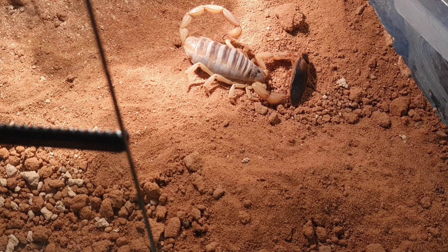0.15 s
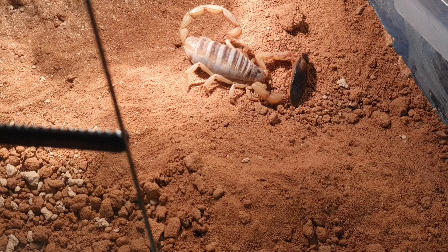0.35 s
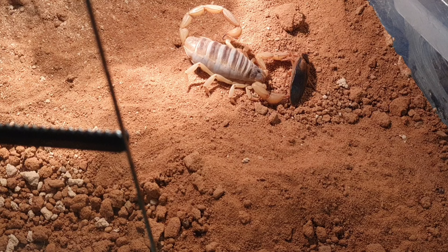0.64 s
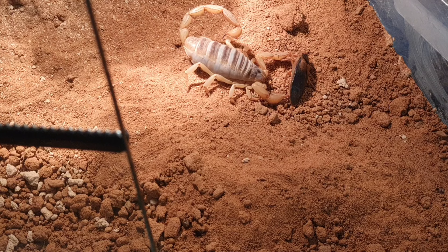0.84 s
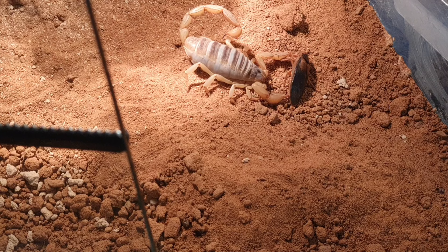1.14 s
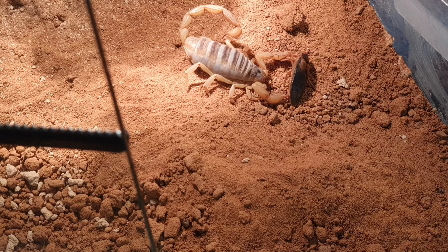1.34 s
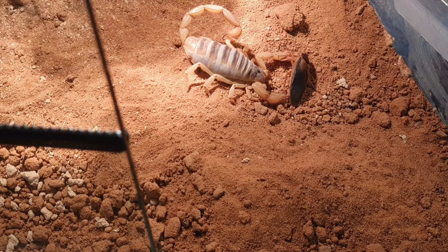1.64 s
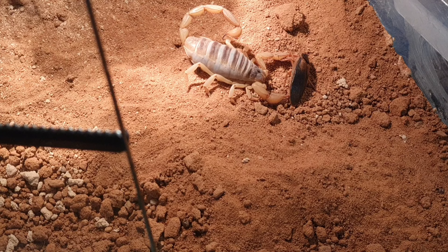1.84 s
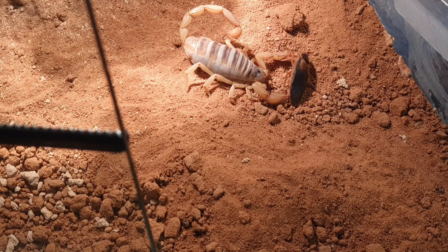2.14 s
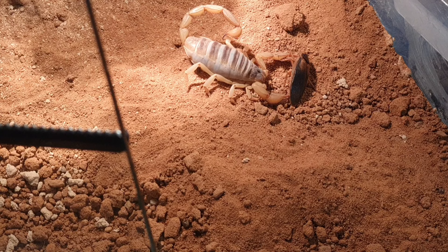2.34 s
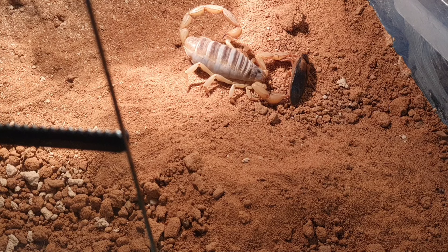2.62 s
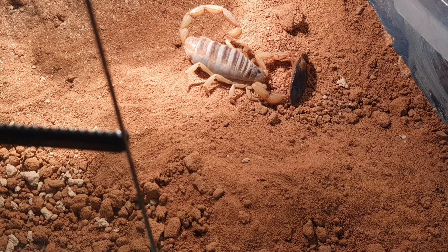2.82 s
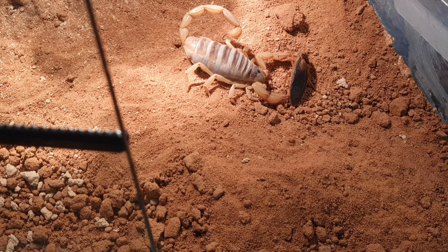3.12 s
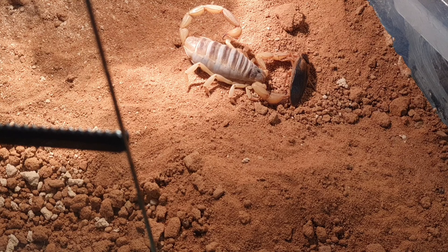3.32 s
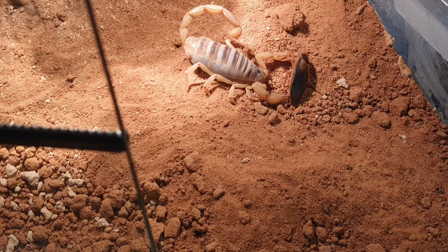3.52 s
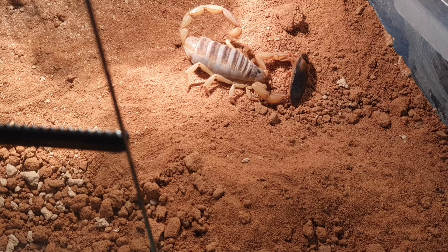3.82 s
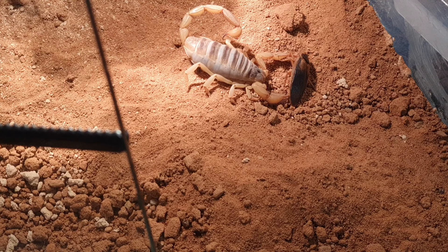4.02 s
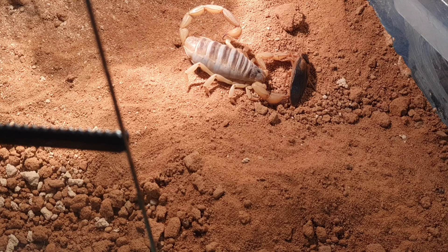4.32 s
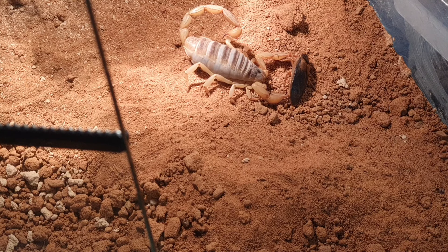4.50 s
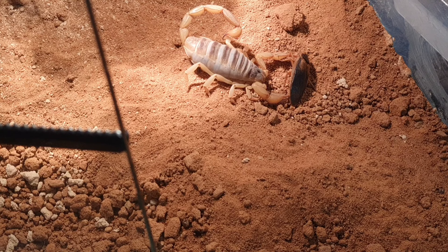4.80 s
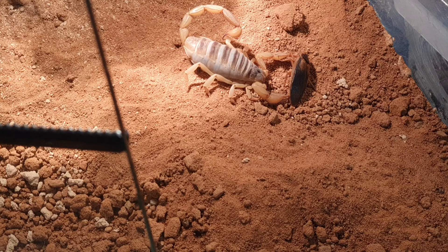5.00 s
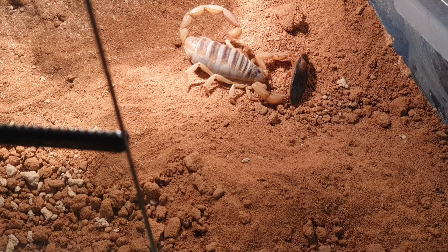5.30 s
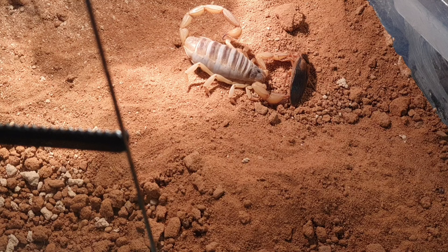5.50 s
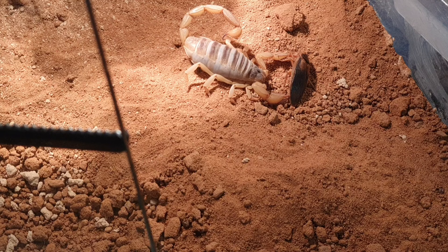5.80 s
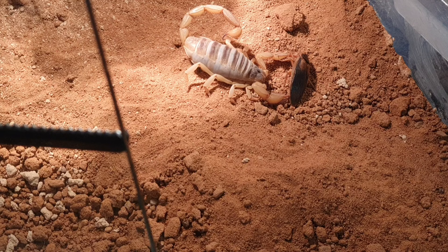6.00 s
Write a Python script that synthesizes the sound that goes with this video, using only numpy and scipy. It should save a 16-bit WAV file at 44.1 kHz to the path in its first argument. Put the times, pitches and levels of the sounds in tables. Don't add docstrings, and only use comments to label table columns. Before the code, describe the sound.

A sprayer is knocked down on a hollow table, cloth rustles, then its fine hiss builds into wet, uneven spattering indoors.

```python
import sys
import numpy as np
from scipy import signal
from scipy.fft import rfft, irfft, next_fast_len
from scipy.io import wavfile
from scipy.ndimage import map_coordinates

SR = 44100
rng = np.random.default_rng(int(sys.argv[2]) if len(sys.argv) > 2 else 0)


def natural_amplitude(level_db):
    exponent = np.asarray(level_db, float) / 20
    return 10 ** exponent


def inscribe(sig):
    pcm = np.round(np.clip(np.atleast_2d(sig).T, -1, 1) * 32767)
    wavfile.write(sys.argv[1], SR, pcm.astype(np.int16))


N = 271215

# hz, level_db
ROOM_TONE = [(25, 7), (60, 11), (150, -2), (320, -13.5), (620, -10.5), (1200, -20.5), (3000, -20.5),
             (5300, -17), (6500, -30), (8300, -27), (15800, -33)]
# hz, level_db
GRIP_RUMBLE = [(25, 10.5), (70, -1.5), (150, -4.5), (300, -16), (600, -12.5), (1200, -65)]
# start_s, level_db
GRIP_SHIFTS = [
    (1.29, -63),
    (1.95, -65),
    (2.96, -56),
    (3.39, -62),
    (4.34, -62),
    (4.98, -79),
    (5.5, -51.5),
    (5.9, -67),
]
# start_s, peak_db
TRIGGER_TICKS = [(.092, -78), (.283, -72), (0.269, -79), (0.363, -70), (.3785, -73), (0.6541, -64),
                 (.6665, -60), (.687, -66), (.6945, -70), (.7244, -58), (.7404, -57)]
# hz, level_db
TRIGGER_SPECTRUM = [(4000, -26), (6500, -14), (8300, 6.5), (10000, -8), (12500, -2.5), (15800, -13)]
# start_s, thud_db, crack_db, favoured_hz, rise_s
CONTACTS = [(0.1218, -16.5, -31.5, 263, 0.0048), (0.1339, -16.5, -26.5, 304, 0.0015),
            (0.148, -13, -27.5, 91, 0.0047), (.159, -17, -25.5, 356, 0.00093),
            (.177, -21, -65, 140, 0.0014), (.245, -26, -64, 115, 0.0033), (.425, -32, -80, 240, 0.02),
            (.438, -40.5, -80, 420, 0.011), (0.461, -48, -70, 230, 0.011), (.464, -29, -75, 165, .012),
            (.53, -46.5, -80, 154, 0.0062), (1.304, -44.5, -70, 510, 0.0064), (5.499, -45, -75, 204, .015),
            (5.57, -63, -75, 109, .01), (5.887, -35.5, -75, 63.6, 0.026), (6.041, -49, -75, 100, 0.013)]
# mode_hz, level_db, t60_s
TABLE_MODES = [(70, -5, 0.24), (105.6, 2.5, 0.087), (140, -4, 0.23), (158, -3.5, 0.1), (204, -13, 0.14),
               (237, -2.5, 0.097), (288, -14, 0.086), (310, -12, 0.1), (364.5, -16, 0.22), (483, -2, 0.095),
               (563, -15.5, 0.22), (627, -14, 0.19), (777, -11, 0.07), (930, -38, .1)]
# hz, level_db
CRACK_SPECTRUM = [(500, -15), (1000, -2.5), (1800, 0), (2800, -2), (3600, -3.5), (4500, -4.5), (5800, -14),
                  (8000, -20), (15800, -21)]
# hz, difference_db
THUD_TILT = [(50, 4), (100, 1.8), (200, 0.5)]
# hz, level_db
CLOTH_SPECTRUM = [(600, -6), (1500, -3), (2500, -5), (3100, 0), (3550, -5), (4000, -1), (4700, -7),
                  (5500, -8), (6500, -17), (15800, -28)]
# hz, level_db
NOZZLE_SPECTRUM = [(300, -25.5), (700, -17.5), (1500, -9), (3000, -9), (5000, -2), (7000, -10),
                   (8200, -0.5), (9700, -4), (11000, 0.5), (13500, 0.5), (15000, -6), (15850, -1.5)]
# hz, level_db
SPATTER_SPECTRUM = [(250, -65), (500, -5.5), (900, -10), (1500, 0), (1900, 2), (3000, 5), (4400, -9),
                    (5500, 1), (7000, -15.5), (8200, -0.5), (9500, -10.5), (12000, -36), (15800, -7)]
# hz, level_db
SPURT_SPECTRUM = [(400, -36), (900, -4.5), (2000, 2), (3200, -4), (4300, 3), (5000, -5.5), (5800, -3.5),
                  (8000, -20.5), (12000, -45)]
# hz, level_db
FIZZ_SPECTRUM = [(5000, -29), (7000, -4), (7900, 2.5), (9200, 0), (10500, -13), (15800, -34)]
# hz, level_db
DROP_SPECTRUM = [(300, -19.0), (550, -11.5), (15800, -3)]
# mode_hz, width_hz, level_db
WALL_MODES = [(2907, 55, -13.5), (3457, 40, 1), (3705, 82, 6.5), (4054, 80, 2), (4244, 34, -2),
              (4540, 166, 6), (4770, 108, 11), (5180, 54, -9), (6360, 220, 5), (6730, 90, -2),
              (7460, 86, -3), (8660, 110, 5)]
# mode_hz, width_hz, level_db
AIR_POCKETS = [(598, 37, -8), (771, 20, -10), (878, 37, -7.5), (1502, 62, 2), (1610, 16, -1)]
# start_s, peak_db
SMALL_SPURTS = [(0.91, -33), (1.005, -42), (1.054, -31), (1.112, -40), (1.199, -34), (1.279, -36),
                (1.349, -37), (1.518, -40), (1.542, -29), (1.599, -31), (1.66, -20), (1.756, -18.5),
                (1.908, -26), (1.963, -32), (1.99, -28), (2.073, -21), (2.118, -24), (2.251, -25),
                (2.328, -31), (2.423, -36), (2.483, -31), (2.534, -19), (2.632, -33), (2.666, -40),
                (2.765, -36), (2.816, -29), (2.865, -49), (2.97, -31), (3.0, -36), (3.044, -21),
                (3.077, -24), (3.16, -23), (3.242, -38), (3.328, -27), (3.371, -19), (3.426, -19),
                (3.626, -25), (3.691, -22), (3.803, -27), (3.995, -18), (4.204, -27), (4.256, -32),
                (4.344, -40), (4.504, -15), (4.565, -23), (4.801, -20), (4.906, -34), (5.04, -23),
                (5.555, -29), (5.922, -16)]
# start_s, peak_db, hollow_db
STRONG_SPURTS = [(3.502, -28.5, -19.5), (3.7413, -27, -26), (3.943, -26, -22), (4.074, -26.5, -17.5),
                 (4.129, -26, -18), (4.301, -39.5, -41), (4.377, -27.5, -20), (4.4383, -32.5, -19),
                 (4.481, -44, -9.5), (4.6296, -23.5, -25), (4.683, -30, -14), (4.751, -26, -17),
                 (4.963, -31.5, -34), (5.068, -32, -41), (5.132, -28.5, -23), (5.232, -25.5, -23.5),
                 (5.2969, -35, -10), (5.341, -27.5, -19), (5.417, -23.5, -16), (5.481, -26.5, -14.5),
                 (5.5393, -28, -12.5), (5.612, -22.5, -27), (5.658, -29.5, -11), (5.703, -26, -18),
                 (5.773, -30.5, -20), (5.86, -29.5, -19), (5.975, -42, 1.5), (6.0235, -33.5, -4),
                 (6.054, -25, -30), (6.1345, -28, -17)]
# start_s, peak_db
BIG_DROPS = [
    (2.9763, -34),
    (3.544, -37),
    (3.899, -31),
    (4.304, -34),
    (4.7698, -25),
    (4.875, -30),
    (5.0677, -29),
    (5.2933, -33.5),
    (5.9142, -50),
    (6.0134, -32),
]
# hz, likeness_0_to_1
LIKENESS = [(300, .88), (1200, .85), (1600, .65), (1780, .94), (2050, .85), (2300, .7), (3200, .72),
            (4400, .92), (5200, .72), (8000, .65), (15800, .42)]
# hz, level_db
FAR_SHADOW = [(200, -1.5), (900, 1.5), (1500, -5.5), (1900, 0.5), (2500, -0.5), (4500, -3), (7000, 1.5),
              (7600, -8), (8100, -37), (8600, -14), (9600, -5.5), (12000, -10.5), (15800, -13)]
# hz, lead_rad
NEAR_LEAD = [(0, 0), (1300, 2.8), (1880, 3.15), (2150, 4), (3360, 7.2), (4050, 6.8), (4650, 8.9),
             (5600, 9.6), (6550, 12.7), (6980, 12.9), (9130, 15.5), (10400, 19.4), (12500, 21.5),
             (15800, 26.6)]
# left_ms, left_gain, right_ms, right_gain
EARLY_ECHOES = [(.635, .07, .68, .11), (.84, -.09, 1.23, -.06), (1.865, -.06, 2.4, .08),
                (2.73, .07, 2.64, .06), (2.885, .11, 2.91, .13), (3.29, -.06, 3.445, -.05),
                (2.81, -.05, 2.53, -.06), (3.7, -.07, 4.29, .04)]
# hz, t60_s
ROOM_DECAY = [(100, 0.64), (250, 0.38), (500, 0.23), (2000, 0.11), (8000, 0.071)]

GRIP_DB = -73
SEEP_DB, LEAK_S, LEAK_DB, LEAK_DB_PER_S = -85.5, 0.65, -88, 150
CLOTH_DB, SETTLE_DB, SETTLE_T60_S = -78.5, -60.5, 0.34
OPEN_S, VALVE_DB_PER_S = 0.632, 383
LAND_S, LANDING_DB_PER_S = 0.706, 750
FULL_DB, SHORTFALL_DB, BUILD_S, SAG_DB_PER_S = -46, 18.5, 0.38, 0.5
BED_DB, WETTER_DB_PER_S = -45.5, 0.0963
FILM_DB, DRY_DB, FILM_S, SPREAD_S = 3, 15, 2.37, 0.29
SPURT_GAIN_DB, SPURT_FIZZ_DB, SPURT_T60_S = 11.5, -36, 0.076
SMALL_GAIN_DB, SMALL_T60_S = -1.5, 0.073
STREAM_DB, STREAM_DB_PER_S = 10, 2.5
HOLLOW_DB_PER_S = 1

TIME_S = np.arange(N) / SR


def unit(x):
    return x / np.sqrt(np.mean(x ** 2) + 1e-20)


def along(points, hz):
    f, v = np.transpose(points)
    return np.interp(np.log(hz + 1), np.log(f + 1), v)


def wobble(knots_per_s):
    knots = rng.standard_normal(int(N * knots_per_s / SR) + 4)
    return map_coordinates(knots, [np.arange(N) * knots_per_s / SR])


def filtered(x, response):
    m = next_fast_len(N + SR // 2)
    return irfft(rfft(x, m) * response(np.fft.rfftfreq(m, 1 / SR)), m)[..., :N]


def resonant(x, modes, direct):
    def response(f):
        return direct + sum(natural_amplitude(db) * 1j * f * width / (hz * hz - f * f + 1j * f * width)
                            for hz, width, db in modes)
    return filtered(x, response)


def hiss(spectrum, grain_db=0, channels=2):
    noise = rng.standard_normal((channels, N))
    grain = natural_amplitude(grain_db * np.clip(rng.standard_normal(N), -3, 2.4))
    return unit(filtered(noise * grain, lambda hz: natural_amplitude(along(spectrum, hz))))


def swells(start_s, db, t60_s, rise_s):
    out, t = np.zeros(N + SR), np.arange(SR // 5) / SR
    for s, level_db, life_s in np.broadcast(start_s, db, t60_s):
        decay = natural_amplitude(level_db - 60 * t / max(life_s, 0.005))
        out[round(s * SR):][:len(t)] += decay * (1 - np.exp(-t / rise_s)) ** 2
    return out[:N]


def reaching():
    return np.interp(TIME_S, [0.2, 0.24, 0.76, 0.8], [0, 1, 1, 0])


def air():
    tone = hiss(ROOM_TONE, channels=3)
    low = hiss(GRIP_RUMBLE, channels=3)
    grip = natural_amplitude(GRIP_DB + 3.0 * wobble(9.2)) + swells(*np.transpose(GRIP_SHIFTS), 0.46, rise_s=0.035)
    held = np.interp(TIME_S, [0.55, 0.7], [0, 1]) * grip
    return natural_amplitude(-74) * (tone[:2] + 0.42 * tone[2]) + held * (low[:2] + 1.72 * low[2])


def trigger():
    leak = (TIME_S > LEAK_S) * natural_amplitude(np.minimum(LEAK_DB + LEAK_DB_PER_S * (TIME_S - LEAK_S), 0))
    s, db = np.transpose(TRIGGER_TICKS)
    ticks = swells(s, db + 4.0, 0.023, rise_s=0.00034)
    return (reaching() * (natural_amplitude(SEEP_DB) + leak) + ticks) * hiss(TRIGGER_SPECTRUM)


def knock():
    out, t = np.zeros((2, N + SR)), np.arange(SR // 3) / SR
    hz, level_db, t60_s = np.transpose(TABLE_MODES)[..., None]
    for s, db, _, favoured_hz, rise_s in CONTACTS:
        chance = rng.standard_normal((3, len(TABLE_MODES), 1))
        favour_db = -8.1 * np.log2(hz / favoured_hz) ** 2
        rise = 1 - np.exp(-t / rise_s)
        for side, sign in enumerate((1, -1)):
            uneven_db = 1.5 * chance[0] + 1.5 * sign * chance[1]
            size = natural_amplitude(level_db + favour_db + uneven_db - 60 * t / t60_s)
            ring = size * np.sin(2 * np.pi * hz * t + 0.23 * sign * chance[2])
            out[side, round(s * SR):][:len(t)] += natural_amplitude(db - 5.0) * ring.sum(0) * rise
    thud = filtered(out[:, :N], lambda f: natural_amplitude(along(THUD_TILT, f) * [[-0.5], [0.5]]))
    s, _, crack_db = np.transpose(CONTACTS)[:3]
    snap = swells(s, crack_db - 4.5, 0.037, rise_s=0.00057)
    after = swells(s, crack_db - 28.5, 0.2, rise_s=0.003)
    return thud, (snap + after) * hiss(CRACK_SPECTRUM, grain_db=3)


def cloth():
    level = natural_amplitude(CLOTH_DB) + natural_amplitude(SETTLE_DB - 60 * np.abs(TIME_S - 0.2) / SETTLE_T60_S)
    return reaching() * level * natural_amplitude(1.5 * wobble(40)) * hiss(CLOTH_SPECTRUM, grain_db=4)


def jet_levels():
    shortfall_db = SHORTFALL_DB * np.exp(-(TIME_S - OPEN_S) / BUILD_S)
    pressure_db = FULL_DB - shortfall_db - SAG_DB_PER_S * np.clip(TIME_S - 3, 0, None)
    nozzle_db = np.minimum(pressure_db, -103 + VALVE_DB_PER_S * (TIME_S - OPEN_S))
    onset = natural_amplitude(np.minimum(-96.0 + LANDING_DB_PER_S * (TIME_S - LAND_S) - BED_DB, 40))
    bed_db = BED_DB + WETTER_DB_PER_S * TIME_S + 20 * np.log10(onset / (1 + onset))
    film_db = FILM_DB - DRY_DB / (1 + np.exp((TIME_S - FILM_S) / SPREAD_S))
    return nozzle_db, bed_db, film_db


def spurt_rows():
    s, db, hollow_db = np.transpose(STRONG_SPURTS)
    small_s, small_db = np.transpose(SMALL_SPURTS)
    luck = rng.standard_normal((len(SMALL_SPURTS), 2))
    return (np.r_[s, small_s],
            np.r_[db + SPURT_GAIN_DB, small_db + SMALL_GAIN_DB],
            np.r_[hollow_db, -21 + 4 * luck[:, 0]],
            np.r_[SPURT_FIZZ_DB + 0 * s, -15 + 3 * luck[:, 1]],
            np.r_[SPURT_T60_S + 0 * s, SMALL_T60_S + 0 * small_s])


def spray():
    nozzle_db, bed_db, film_db = jet_levels()
    s, db, hollow_db, fizz_db, t60_s = spurt_rows()
    flutter_db = 0.17 * wobble(26.4) + 1.3 * wobble(60)
    nozzle = natural_amplitude(nozzle_db + 6.5 + flutter_db) * hiss(NOZZLE_SPECTRUM, grain_db=5.0)

    bed = natural_amplitude(bed_db - 4.0 + 1.16 * wobble(45))
    gulps = swells(s - 0.008, db + 4.5, 0.6 * t60_s, rise_s=0.014)
    stream = natural_amplitude(bed_db + STREAM_DB + STREAM_DB_PER_S * (TIME_S - 8) + 3.7 * wobble(40))
    spurts = natural_amplitude(-9.0) * (gulps + stream) * hiss(SPURT_SPECTRUM, grain_db=4)
    landing = bed * hiss(SPATTER_SPECTRUM, grain_db=4.5)
    spatter = resonant(landing + spurts, WALL_MODES, direct=0.92)

    spurt_fizz = swells(s, db + fizz_db - 8.0, 0.38 * t60_s, rise_s=0.0018)
    film = natural_amplitude(film_db + 2.1 * wobble(45)) * bed
    snaps = swells(*np.transpose(BIG_DROPS), 0.015, rise_s=0.00035)
    fizz = (spurt_fizz + film + snaps) * hiss(FIZZ_SPECTRUM, grain_db=6.0)

    drops = unit(resonant(hiss(DROP_SPECTRUM), AIR_POCKETS, direct=0))
    steady = natural_amplitude(-10 + HOLLOW_DB_PER_S * (TIME_S - 4.5) + 3.3 * wobble(25)) * bed
    hollow = (steady + swells(s, db + hollow_db + 4.0, 0.67 * t60_s, rise_s=0.0057)) * drops
    return (TIME_S > OPEN_S) * (nozzle + spatter + fizz + hollow)


def ports(pair):
    def split(hz):
        share = np.clip(along(LIKENESS, hz), 0, 1)
        return np.array([share, np.sqrt(1 - share ** 2)])

    def echo(hz, k):
        return 1 + sum(e[k + 1] * np.exp(-2j * np.pi * hz * e[k] / 1000) for e in EARLY_ECHOES)

    def far(hz):
        return natural_amplitude(along(FAR_SHADOW, hz)) * np.exp(-1j * np.interp(hz, *np.transpose(NEAR_LEAD)))

    common, own = filtered(pair, split)
    both = np.array([pair[0], common + own * natural_amplitude(2.24 * wobble(8))])
    return filtered(both, lambda hz: np.array([echo(hz, 0), echo(hz, 2) * far(hz)]))


def room(x):
    hz, t, z = signal.stft(rng.standard_normal((2, SR // 2)), SR, nperseg=256)
    alike = np.clip(1 - hz / 500, 0, 1)[:, None]
    z[1] = alike * z[0] + np.sqrt(1 - alike ** 2) * z[1]
    decay = natural_amplitude(-60 * t / along(ROOM_DECAY, hz)[:, None])
    tail = signal.istft(z * decay, SR, nperseg=256)[1]
    late = np.pad(x, ((0, 0), (300, 0)))
    return signal.fftconvolve(late, tail / np.linalg.norm(tail[0]), axes=1)[:, :N]


def scene():
    thud, crack = knock()
    near = ports(spray() + trigger() + crack)
    reverb = room(natural_amplitude(-8.0) * near + natural_amplitude(-12.5) * thud)
    return near + thud + reverb + cloth() + air()


def band_limit(x):
    return signal.sosfilt(signal.butter(12, 15840, fs=SR, output="sos"), x)


def record(dry):
    low_hz, top_hz = 40, 15830
    mix = filtered(dry, lambda hz: (1j * hz / (low_hz + 1j * hz)) ** 3 * (hz < top_hz))
    return band_limit(mix)


dry = scene()
out = record(dry)
inscribe(out)
```